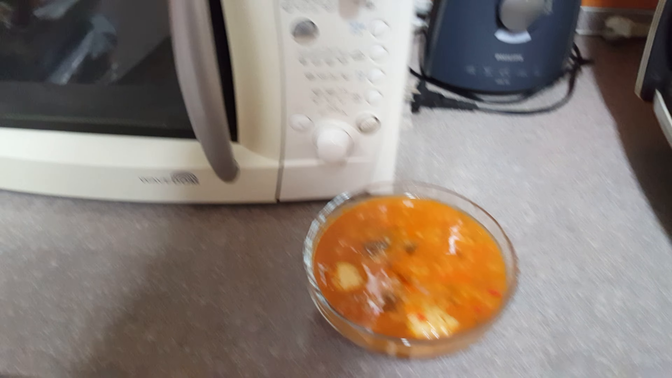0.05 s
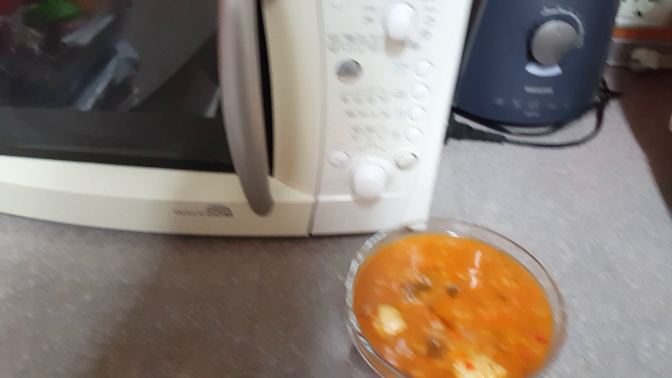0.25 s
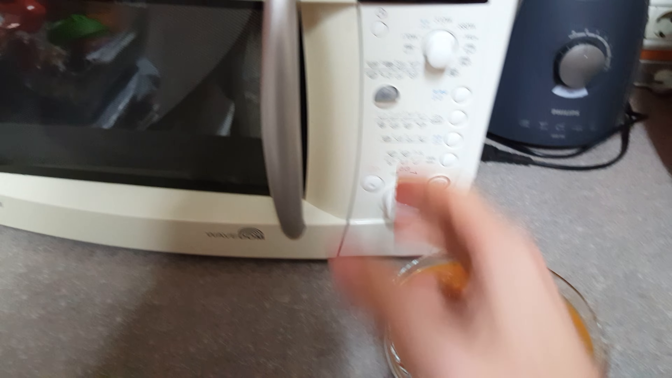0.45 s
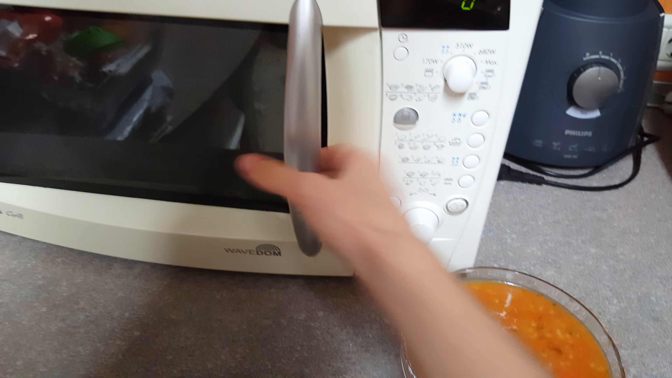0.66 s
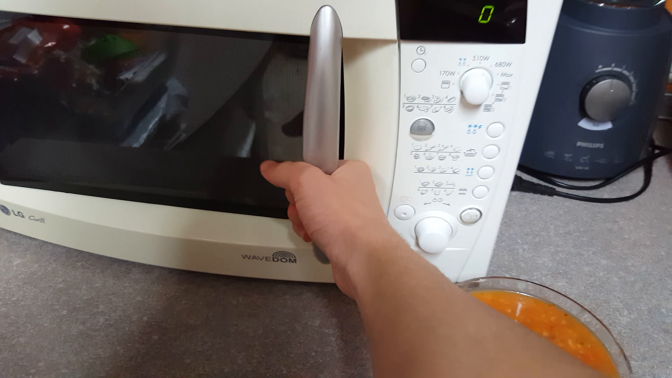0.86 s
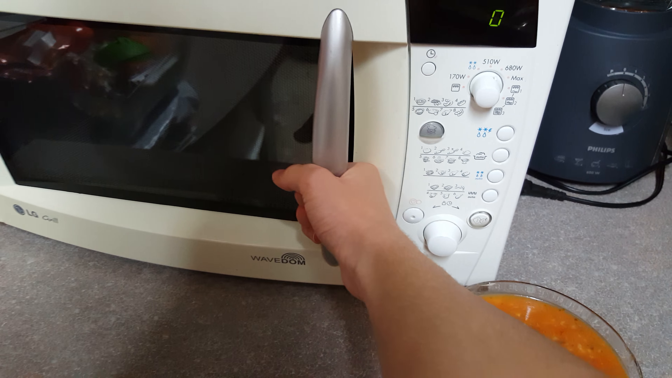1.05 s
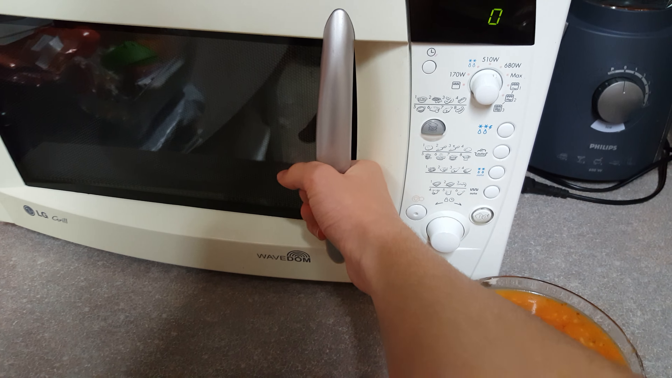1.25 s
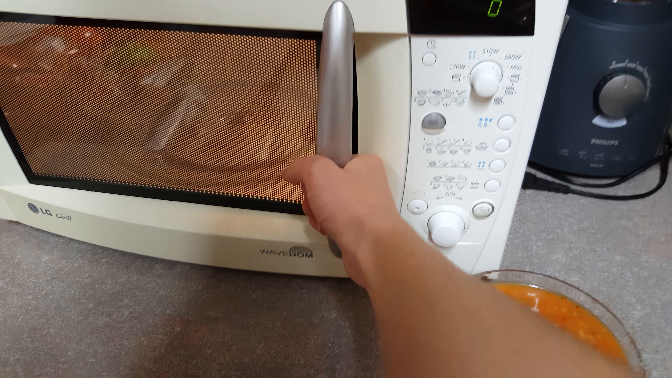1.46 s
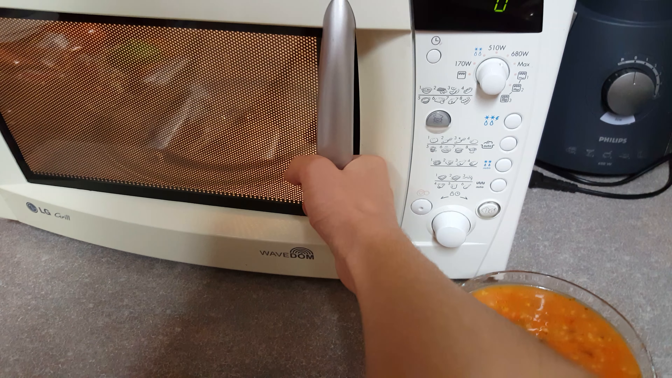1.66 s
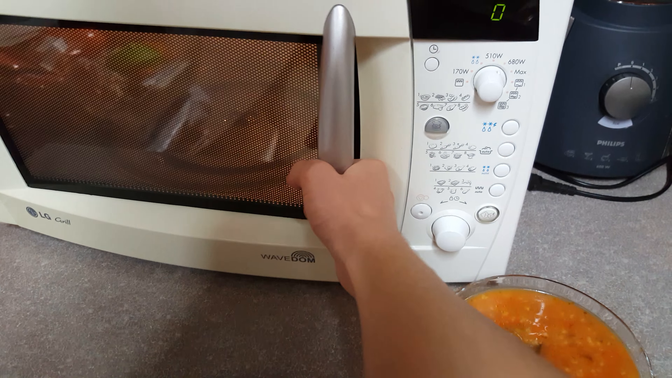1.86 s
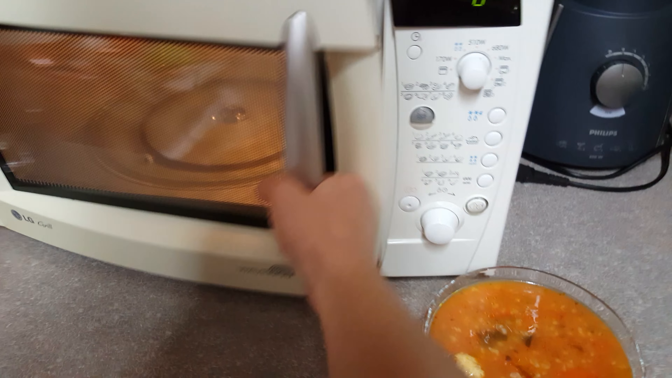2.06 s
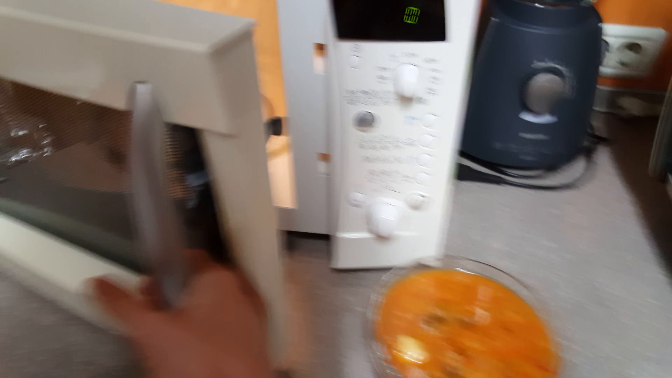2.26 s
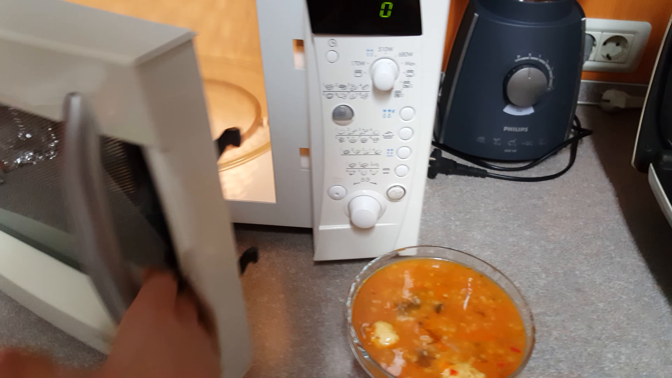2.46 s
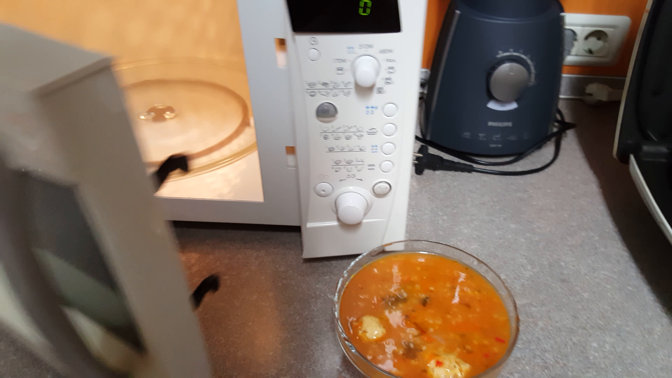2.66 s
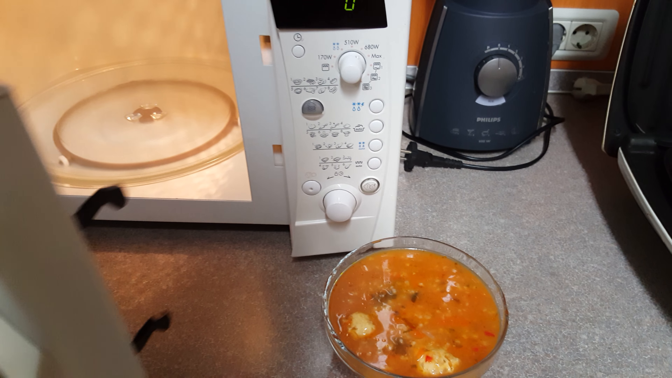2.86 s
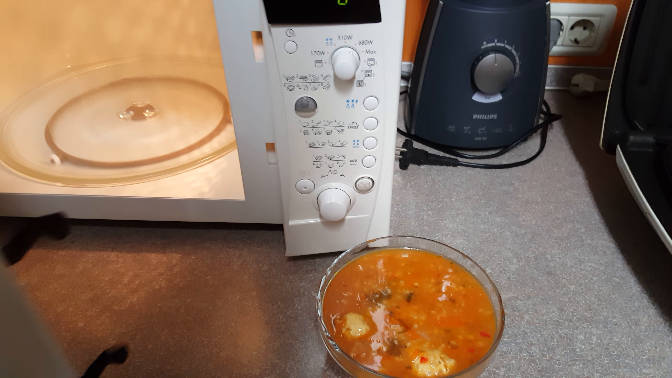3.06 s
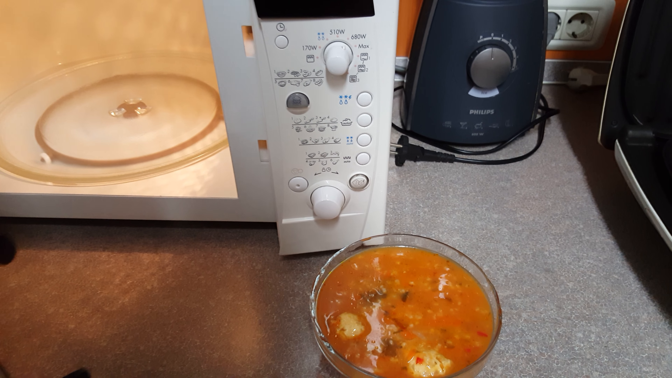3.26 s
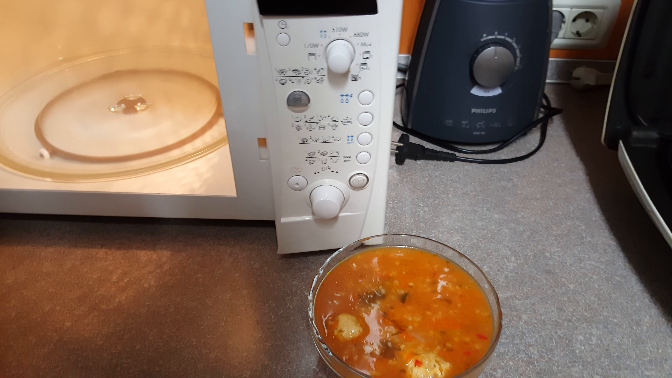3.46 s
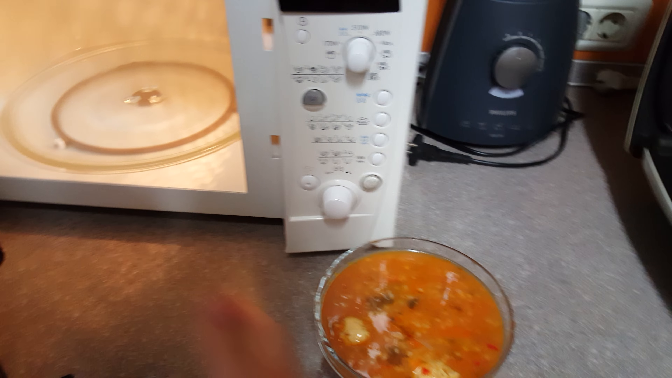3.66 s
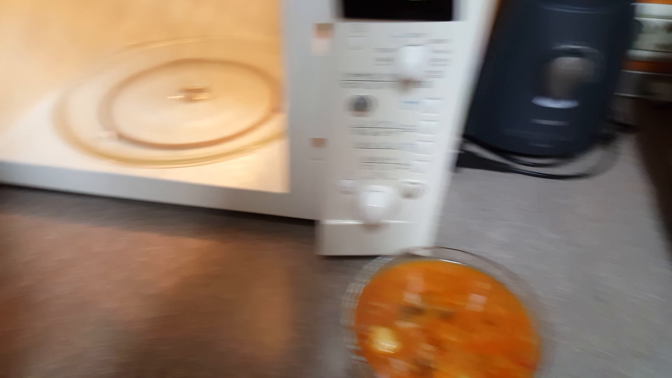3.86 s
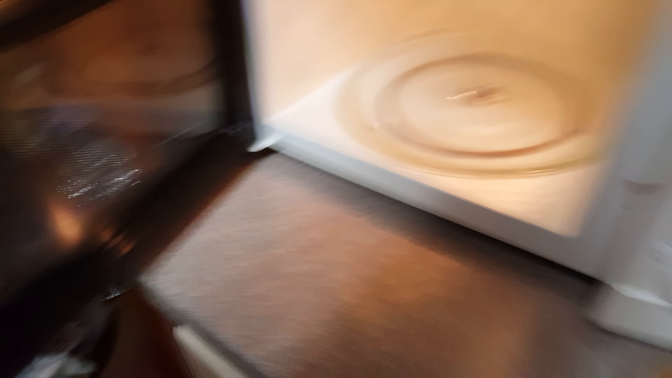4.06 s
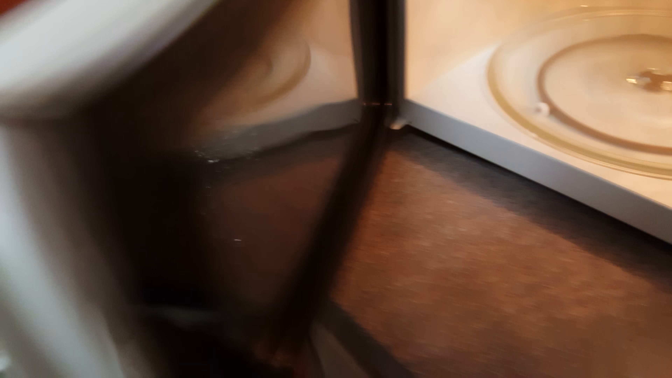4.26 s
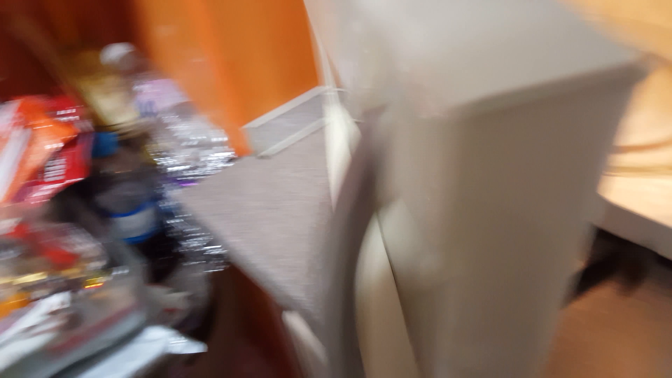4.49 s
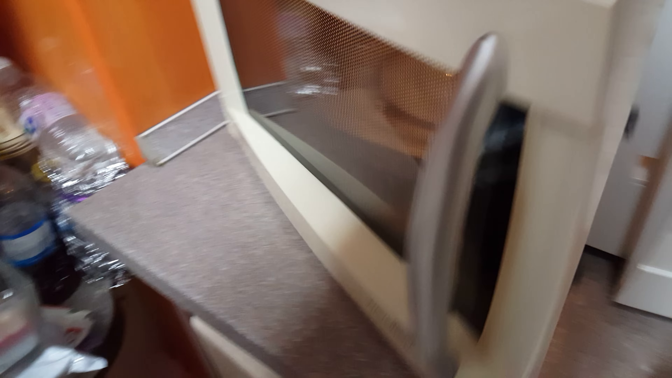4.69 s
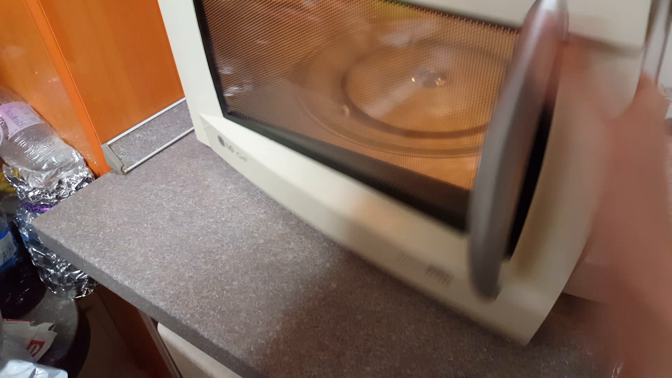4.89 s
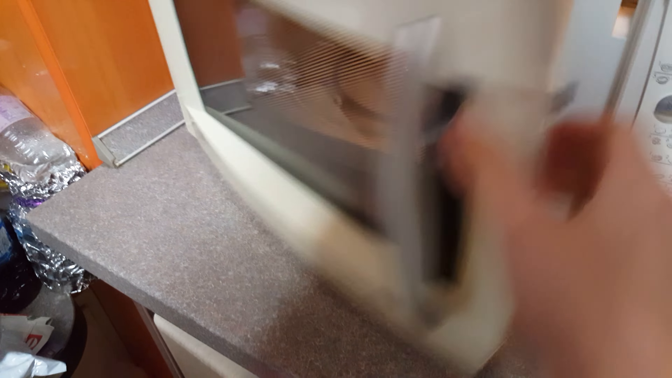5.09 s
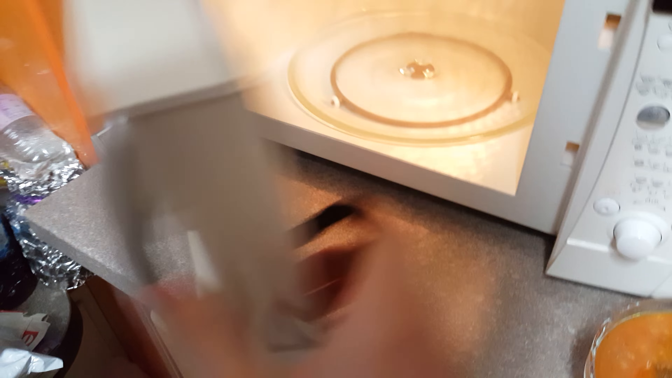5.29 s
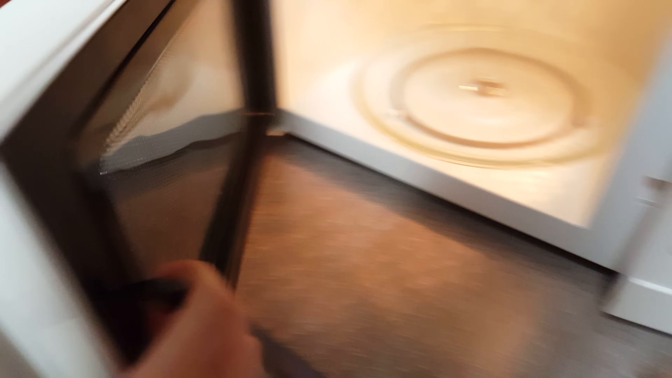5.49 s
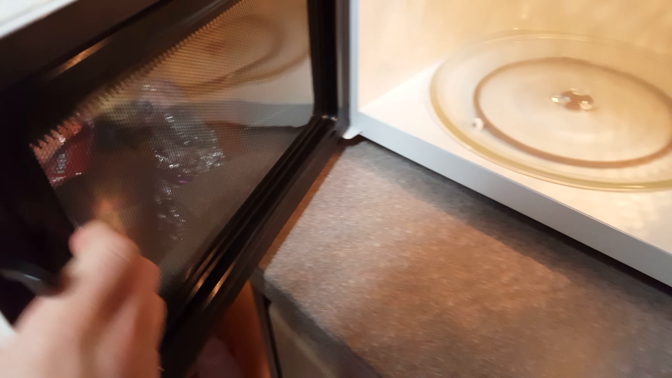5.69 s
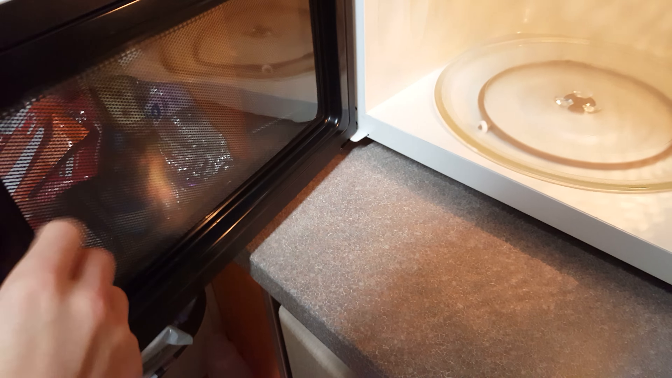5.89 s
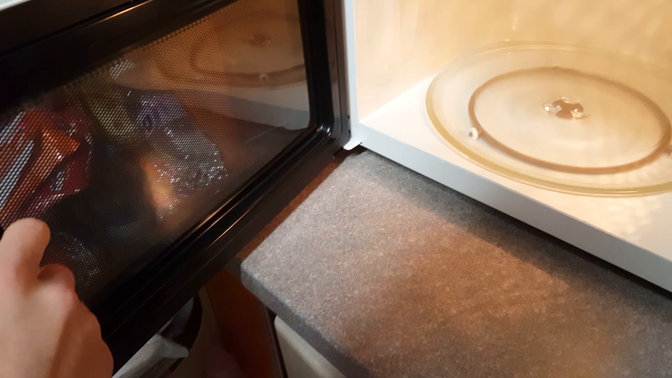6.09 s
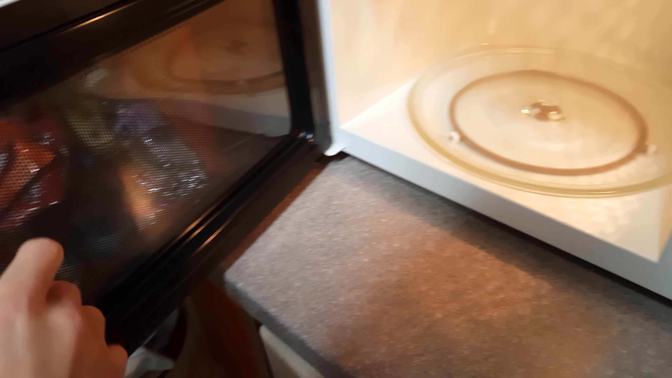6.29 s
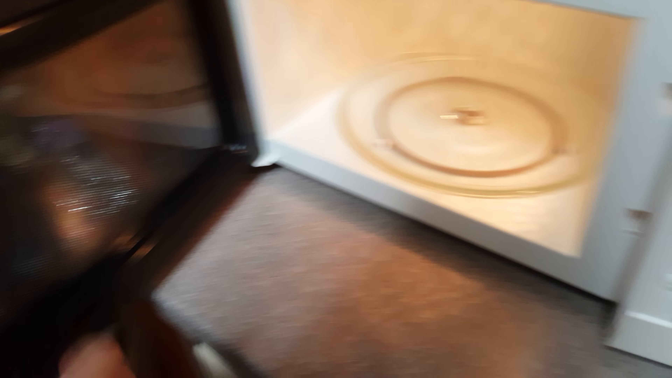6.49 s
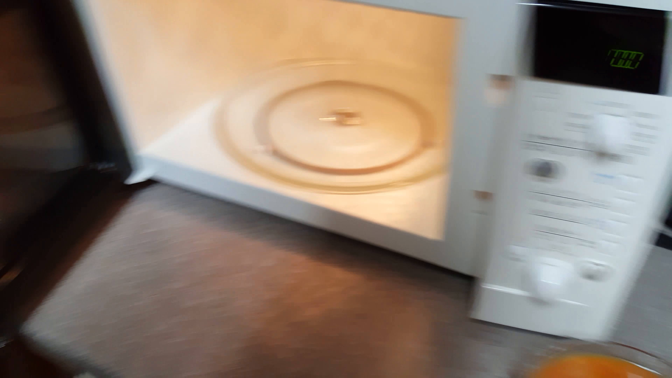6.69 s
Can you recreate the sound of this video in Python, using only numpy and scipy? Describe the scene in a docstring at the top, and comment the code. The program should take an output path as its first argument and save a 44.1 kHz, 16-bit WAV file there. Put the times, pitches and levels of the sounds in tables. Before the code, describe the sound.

Heard at arm's length in stereo: light knocks of fingers on a hollow plastic microwave door, then clicks and a rapid, heavy, boomy clatter as the latch releases. A dry rasp and short thin hinge squeak follow as it swings. About a second of quiet air passes before a hard double bang and rattle. The door swings back, is caught with a crisp clack, and is handled gently with faint scrapes and a last dull tap.

```python
"""In a small kitchen, at arm's length from a microwave oven, a two-port microphone hears its door opened by hand.
A hand grips the handle, latch hooks drag and snap free, the hinge squeaks; the door bumps, rattles against its stop,
swings back and is caught. Blows are noise bursts ringing panel modes; shoves are short low thumps that boom in the
steel cabinet. Slides are dense runs of tiny slips, the squeak is a few harmonics, and thin ticks are filtered noise.
Still air (shaped noise) and a faint mains hum (sines) lie underneath; decaying noise gives the room."""
import sys
import numpy as np
from scipy import signal
from scipy.fft import rfft, irfft, next_fast_len
from scipy.io import wavfile
from scipy.ndimage import uniform_filter1d

SR = 44100
rng = np.random.default_rng(int(sys.argv[2]) if len(sys.argv) > 2 else 0)


def to_wav(s):
    """Save 16-bit WAV."""
    ch = np.atleast_2d(s).T  # columns
    pcm = np.round(np.clip(ch, -1, 1) * 32767)  # PCM
    wavfile.write(sys.argv[1], SR, pcm.astype(np.int16))


N = 297234
TIME = np.arange(N) / SR  # seconds
AGE = TIME[:SR // 2]  # seconds since the start of one short sound

# Still air of the kitchen, relative spectrum: pitch_hz [Hz], level_db [dB per Hz]
AIR_COLOUR = [(15, -30), (25, -4), (53, -9.5), (70, -14), (102, -4.5), (229, -7), (285, -2.5), (503, -10.5),
              (560, -11), (1440, -21.5), (2690, -21.5), (3250, -29), (5430, -33), (16000, -38)]
AIR_DB = -55
# Electrical hum: pitch_hz [Hz], level_db [dB, rms]
HUM = [(48.4, -64.5), (96.9, -63), (285.3, -66.5)]

# Blows on the door, from the grip on the handle to the catch by hand: start_s [s], strength_db [dB],
# hardness [dB per octave of treble], spot_hz [Hz, note of the struck spot], rebounds [count, rounded]
BLOWS = [ (0.348, -48.5, -1, 1110, 0), (0.65, -35, 1, 810, 0.89), (0.713, -37, 2.5, 940, 0.0061),
         (0.732, -38, 3, 890, 0), (0.747, -24, 1.5, 869, 1), (0.897, -36, -21, 840, 0),
         (1.344, -37.5, -7.5, 560, 0), (1.378, -26, 1, 850, 0), (1.482, -25.5, 3.5, 960, 0),
         (1.505, -12, -7, 1008, 0), (1.514, -17.5, 2, 840, 0), (1.58, -33, 7.5, 940, 0),
         (1.689, -29.5, 6, 1060, 0), (1.742, -23.5, -6, 860, 0), (1.754, -33.5, 6.5, 1240, 0),
         (1.768, -12, -3, 878, 0), (1.835, -29.5, 7, 844, 0), (1.896, -21, -1.5, 856, 0),
         (1.907, -15.5, -0.5, 1000, 1), (1.942, -21, 4, 820, 0), (1.965, -12, 0.2, 800, 0),
         (1.977, -14, -0.5, 886, 0), (1.995, -18, 0.2, 882, 1), (2.064, -29, 4.5, 757, 0),
         (2.141, -36.5, 2, 1020, 0.097), (2.201, -27, 1.5, 2500, 0), (2.248, -18, -6.5, 933, 1),
         (2.304, -32.5, 4, 2200, 0.21), (2.589, -28, 4.5, 1150, 0), (3.782, -22, -3, 1130, 0),
         (3.79, -13.5, 1.4, 1850, 0), (3.796, -15, 0.5, 1945, 0), (3.878, -26.5, 1.5, 1740, 0.13),
         (3.93, -30.5, -0.5, 1484, 0), (4.042, -10.5, 1.5, 1130, 0), (4.05, -7, -0.5, 1170, 0),
         (4.065, -17, 0.5, 840, 0), (4.079, -11.5, 0.5, 864, 0), (4.092, -14.5, 0.5, 2155, 0),
         (4.11, -17, 1, 1035, 0), (4.484, -41, 0, 1240, 0.093), (4.782, -37, 1, 1966, 0.54),
         (4.931, -20.5, 1.35, 3290, 0), (4.951, -32, -0.5, 906, 0), (4.963, -34, 3, 760, 0),
         (4.981, -24.5, 2.5, 900, 0), (5.128, -47.5, 6.5, 770, 0), (5.501, -38, -3.5, 870, 0),
         (5.631, -39, -2.5, 1510, 0.14), (6.06, -26.5, -4, 1175, 0), (6.072, -34, -5, 610, 0)]
# Clicks of the light latch parts: start_s [s], strength_db [dB], spot_hz [Hz]
CLICKS = [(0.838, -26.5, 1308), (0.856, -44, 980), (1.381, -32.5, 1445), (1.397, -24.5, 940),
          (1.418, -26, 1100), (1.644, -24, 1080), (2.086, -28, 2890), (2.182, -28.5, 2530)]
# The clicks are all hard (dB per octave) and carry little weight (dB of knock)
CLICK_HARDNESS, CLICK_KNOCK_DB = 3.3, -12
# A softer contact pushes longer and so knocks more: dB of knock per unit of hardness
KNOCK_DB_PER_HARDNESS = -0.44
# A loose part rebounds later and weaker: delay of the first, exponent of later delays, drop of the first
REBOUND_S, REBOUND_WIDENING, REBOUND_DB = 0.0095, 1.3, -5
# Registers of a blow (clack, knock, snap, tick): low_hz [Hz], high_hz [Hz], trim_db [dB],
# rise_s [s, time constant], contact_t60_s [s, decay of the contact noise], room_db [dB sent to the room]
REGISTERS = [(640, 2200, -9.5, 0.0019, 0.071, -2.5), (212.3, 700, -6, 0.0014, 0.093, -7),
             (2500, 5300, -17, 0.00047, 0.12, -5), (5830, 15300, -24, 0.00015, 0.08, -5)]
# Door panel modes: pitch_hz [Hz], level_db [dB, relative], t60_s [s]
DOOR = [(177.3, 2, 0.22), (205.8, -5, 0.21), (274.8, -4.5, 0.26), (373.9, -6, 0.23), (408.5, -0.5, 0.12),
        (444, -4, 0.16), (542.3, -7, 0.13), (610, -22, 0.35), (714.3, -9.5, 0.13), (864, -6, 0.1),
        (970, -22, 0.27), (1147, -10, 0.16), (1160, -24, 0.11), (1387, -42, 0.091), (1488, -3.5, 0.027),
        (1920, -25, 0.15), (2260, -5.5, 0.062), (2386, -7.5, 0.058), (2621, -10, 0.11), (2738, -21.5, 0.24),
        (2820, -16, 0.048), (3292, -9, 0.15), (3400, -2.5, 0.02), (3790, -10, 0.072), (4680, -45, 0.1),
        (5370, -28, 0.14)]
# Contact noise, the plastic's countless short modes: pitch_hz [Hz], level_db [dB, relative]
PLASTIC = [(60, 6), (150, 15), (260, -1), (450, 3.5), (700, -1.5), (1050, 2), (1600, -3), (2500, -3.5),
           (3600, -7), (5200, -12.5), (8000, -11.5), (11000, -15.5), (16000, -20)]
# The low note of a struck spot rises with the strength of the blow, from its pitch at a middling one
SPOT_HZ, SPOT_HZ_PER_DB, MIDDLING_DB, SPOT_SPREAD_HZ = 421.8, 3.0, -24.5, 25
# Hardness tilts the registers about this pitch; the register wholly below it takes the weight of knock
PIVOT_HZ = 1150

# Shoves that reach the cabinet: start_s [s], peak_db [dB], pitch_hz [Hz, flexing door]
SHOVES = [(0.664, -36, 112), (0.766, -19.5, 110), (0.896, -23, 112.7), (0.925, -23, 108),
          (0.986, -35.5, 103), (1.383, -20, 114.3), (1.508, -7.5, 125.2), (1.573, -18, 122),
          (1.612, -16.5, 131.7), (1.68, -23, 105), (1.768, -7, 114), (1.815, -17, 118), (1.898, -14.5, 128),
          (1.937, -16, 114), (1.987, -22, 87), (2.246, -21.5, 115), (3.797, -14, 115), (4.043, -20, 146),
          (4.953, -24.5, 106), (5.169, -29.5, 117), (6.065, -35, 103.6)]
# Cabinet modes: pitch_hz [Hz], level_db [dB, relative], t60_s [s]
CABINET = [(118, 11, 0.57), (99.4, 5, 0.45), (137.2, -3, 0.6)]
# Cabinet drone as the door swings back on its hinge: start_s [s], length_s [s], level_db [dB]
DRONE = [(4.64, 0.18, -34.5)]

# Strokes of sliding hooks and fingers: start_s [s], length_s [s], level_db [dB]
SLIDE = [(0.71, 0.17, -43), (1.37, 0.14, -38.5), (1.48, 0.54, -33), (1.92, 0.039, -31.5), (2.14, 0.16, -41),
         (2.36, 0.36, -58), (3.85, 0.062, -36), (4.0, 0.37, -53), (4.465, 0.055, -46), (4.87, 0.46, -48),
         (5.43, 0.19, -49), (5.78, 0.17, -53), (6.0, 0.61, -60)]
# Spectrum of those strokes: pitch_hz [Hz], level_db [dB, relative]
SLIDE_COLOUR = [(50, -18), (120, -27), (170, 11), (300, 3.5), (430, 12.5), (700, -4.5), (1200, -4),
                (1700, -8.5), (2600, -11), (4000, -21.5), (6300, -17.5), (8500, -19), (16000, -35)]
# Dry rasps as the hooks leave their slots and the hinge starts to turn: start_s [s], length_s [s], level_db [dB]
RASP = [(2.135, 0.084, -37.5), (2.3, 0.059, -41.5)]
# Spectrum of the rasps: pitch_hz [Hz], level_db [dB, relative]
RASP_COLOUR = [(200, -57), (1000, -2), (1500, -11.5), (2000, -3.5), (2450, -7), (3100, -11), (3700, -10.5),
               (4500, -20), (7000, -25), (16000, -31)]
# Duller scrapes of the hand on the door's edge: start_s [s], length_s [s], level_db [dB]
SCRAPE = [(3.925, 0.026, -35), (4.48, 0.04, -50.5), (5.32, 0.024, -63.5), (5.52, 0.07, -48)]
# Spectrum of the scrapes: pitch_hz [Hz], level_db [dB, relative]
SCRAPE_COLOUR = [(150, -25), (550, -1), (900, -3.5), (1550, -3), (2300, -17), (5000, -27), (16000, -45)]

# Runs of faint thin ticks: start_s [s], ticks [count], level_db [dB, relative]
TICKS = [(0.959, 2, -56), (2.471, 2, -40), (2.685, 2, -42), (3.916, 1, -37), (4.138, 2, -34.5),
         (4.277, 4, -43), (5.051, 7, -45), (5.705, 2, -44), (5.988, 1, -47.5), (6.13, 2, -43.5)]
TICK_PERIOD_S = 0.0716
# Hinge squeak: time_s [s], pitch_hz [Hz], fundamental_db [dB, relative], octave_db [dB, relative]
SQUEAK = [(2.36, 1086, -60, -52), (2.406, 1071, -39.5, -41), (2.422, 1174, -45, -51),
          (2.478, 1190, -39, -49), (2.514, 1184, -39.5, -44.5), (2.574, 1204, -42.5, -61),
          (2.59, 1150, -46, -57)]

# Reverberation of the room: pitch_hz [Hz], t60_s [s]
ROOM = [(150, 0.99), (300, 0.6), (600, 0.32), (1200, 0.38), (2400, 0.33), (4800, 0.43), (9600, 0.33),
        (15000, 0.44)]
# Balance of the two microphone ports: pitch_hz [Hz], left_minus_right_db [dB]
BALANCE_DB = [(200, 0.6), (700, -.5), (1300, -.4), (2400, 2.9), (4400, 4.1), (5700, 3), (7500, -4),
              (15000, -4.5)]
# Likeness of what the two ports hear: pitch_hz [Hz], likeness [0-1]
LIKENESS = [(100, 0.78), (270, 0.96), (500, 0.76), (1000, 0.11), (2000, 0.0075), (8000, 0.0093)]
# Resonances of the microphone's ducts: pitch_hz [Hz], level_db [dB]
DUCTS = [(1500, -0.5), (2100, -1.5), (2700, 0.5), (3200, -1), (5500, 3), (6100, -3.5), (9400, 0.5),
         (10400, -9), (12500, -2.5), (16000, -1)]
LOW_CUT_HZ, TOP_HZ = 26, 16150


def amp(db):
    """Decibels to gain."""
    return 10 ** (np.asarray(db) / 20)


def curve(rows):
    """Each column of a time table, joined by straight lines."""
    s, *columns = np.transpose(rows)
    return [np.interp(TIME, s, c) for c in columns]


def over_hz(points, size):
    """A (Hz, value) table read at the bins of a spectrum, along a logarithmic pitch scale."""
    hz, value = np.transpose(points)
    bins_hz = np.arange(size // 2 + 1) * SR / size
    return np.interp(np.log(bins_hz + 1), np.log(hz), value)


def unit(x):
    """Scale to rms 1."""
    return x / np.sqrt(np.mean(x ** 2))


def colour(x, points):
    """Give a steady sound a spectrum."""
    size = x.shape[-1]
    return irfft(rfft(x) * amp(over_hz(points, size)), size)


def band(x, lo_hz, hi_hz):
    """Causal band-pass."""
    edges_hz = [lo_hz, min(hi_hz, SR / 2 - 1)]
    return signal.sosfilt(signal.butter(3, edges_hz, "band", fs=SR, output="sos"), x)


def ports(pair):
    """Two unrelated signals become a stereo pair, most alike in the bass."""
    size = pair.shape[-1]
    alike = np.clip(over_hz(LIKENESS, size), 0, 1)
    mid, side = rfft(pair) * np.sqrt([(1 + alike) / 2, (1 - alike) / 2])
    return irfft(np.array([mid + side, mid - side]), size)


def noise(size):
    """White stereo noise as the two ports hear it."""
    return ports(rng.standard_normal((2, size)))


def fade(t60):
    """Exponential decay, down 60 dB after t60 seconds."""
    return np.exp(-np.log(1000) * AGE / t60)


def add(track, s, sound):
    """Mix a sound into a track at time s."""
    start = int(s * SR)
    track[..., start:start + sound.shape[-1]] += sound[..., :N - start]


def swells(rows, attack_s, release_s):
    """Each stroke builds up, holds for its length and dies away."""
    out = 0
    for s, length, db in rows:
        age = np.maximum(TIME - s, 0)
        rise = (1 - np.exp(-age / attack_s)) ** 2
        release = np.exp(-np.maximum(age - length, 0) / release_s)
        out = out + amp(db) * rise * release
    return out


def kitchen():
    """Still air as shaped noise, and a low electrical hum of steady sines."""
    air = unit(colour(noise(next_fast_len(N, True)), AIR_COLOUR))[:, :N]
    hum = 0
    for hz, db in HUM:
        hum = hum + amp(db) * np.sqrt(2) * np.sin(2 * np.pi * (hz * TIME + rng.random()))
    return air * amp(AIR_DB) + hum


def contacts():
    """The latch clicks and every blow with its rebounds: (s, dB, hardness, knock dB, spot Hz)."""
    hits = [(s, db, CLICK_HARDNESS, CLICK_KNOCK_DB, hz) for s, db, hz in CLICKS]
    for s, db, hardness, hz, rebounds in BLOWS:
        knock_db = KNOCK_DB_PER_HARDNESS * hardness
        for k in range(round(rebounds) + 1):
            hit_s = s + REBOUND_S * k ** REBOUND_WIDENING
            hits.append((hit_s, db + REBOUND_DB * np.sqrt(k), hardness, knock_db, hz))
    return hits


def door_blows(ring_db=-10.5, scatter_db=3.0, low_spot_db=-2, low_spot_t60=0.062,
               high_spot_db=-4, high_spot_t60=0.048, onset_s=0.016):
    """Each contact is a noise burst, the panel modes and two short notes of the struck spot; harder is brighter."""
    direct, sent = np.zeros((2, 2, N))
    hz, db, t60 = np.transpose(DOOR)
    modes = amp(db)[:, None] * np.exp(2j * np.pi * hz[:, None] * AGE) * fade(t60[:, None])
    for s, strength_db, hardness, knock_db, high_hz in contacts():
        size, lag = rng.standard_normal((2, len(DOOR)))
        low_hz = SPOT_HZ + SPOT_HZ_PER_DB * (strength_db - MIDDLING_DB)
        low_hz = low_hz + SPOT_SPREAD_HZ * rng.standard_normal()
        # short waves reach the two ports out of step
        turn = np.exp(1j * np.outer([1, -1], lag * np.minimum(hz / 900, 1.5) ** 2))
        ring = ((turn * amp(scatter_db * size)) @ modes).imag * amp(ring_db)
        low_note = np.sin(2 * np.pi * low_hz * AGE) * fade(low_spot_t60)
        high_note = np.sin(2 * np.pi * (high_hz * AGE + rng.random((2, 1)) / 2)) * fade(high_spot_t60)
        ring = ring + amp(low_spot_db) * low_note + amp(high_spot_db) * high_note
        grit = unit(colour(noise(len(AGE)), PLASTIC))
        for lo_hz, hi_hz, trim_db, rise_s, contact_t60, room_db in REGISTERS:
            octaves = np.log2(np.sqrt(lo_hz * hi_hz) / PIVOT_HZ)
            tilt_db = knock_db if hi_hz < PIVOT_HZ else hardness * octaves
            rise = 1 - np.exp(-AGE / rise_s)
            part = band((ring + grit * fade(contact_t60)) * rise, lo_hz, hi_hz)
            # level set by the first moments of the blow
            part = part * amp(strength_db + tilt_db + trim_db) / np.std(part[:, :int(onset_s * SR)])
            add(direct, s, part)
            add(sent, s, part * amp(room_db))
    return direct, sent


def cabinet(shove_s=0.019, rise_s=0.008, ring_db=-6, overtone_hz=284, overtone_db=-17):
    """A shove flexes the door for a few cycles and leaves the steel box booming; it drones as the door swings back."""
    boom = sum(amp(db) * np.sin(2 * np.pi * hz * AGE) * fade(t60) for hz, db, t60 in CABINET)
    boom = boom * (1 - np.exp(-(AGE / rise_s) ** 2))
    boom = boom / np.abs(boom).max()
    # the hand takes up the flexing almost at once
    push = (AGE / shove_s) ** 2 * np.exp(2 * (1 - AGE / shove_s))
    out = np.zeros(N)
    for s, db, hz in SHOVES:
        thump = push * np.sin(2 * np.pi * hz * AGE) + amp(ring_db) * boom
        add(out, s, thump / np.abs(thump).max() * amp(db))
    drone = np.sin(2 * np.pi * CABINET[0][0] * TIME)
    drone = drone + amp(overtone_db) * np.sin(2 * np.pi * overtone_hz * TIME)
    return out + unit(drone) * swells(DRONE, attack_s=0.078, release_s=0.041)


def sliding(pressure, spectrum, slips_per_s, spread_db):
    """Plastic slides in a dense run of tiny uneven slips."""
    size = next_fast_len(N, True)
    happens = rng.random(size) < slips_per_s / SR
    slips = happens * amp(spread_db * np.minimum(rng.exponential(size=size), 4))
    rub = unit(colour(ports(slips * rng.standard_normal((2, size))), spectrum))
    return rub[:, :N] * pressure


def ticks(gain_db=-9, t60=0.12, lo_hz=4300):
    """Thin, bright bursts of decaying noise, singly or in short even runs."""
    out = np.zeros((2, N))
    for s, count, db in TICKS:
        for k in range(round(count)):
            tick = unit(band(colour(noise(len(AGE)), PLASTIC), lo_hz, TOP_HZ))
            add(out, s + k * TICK_PERIOD_S, tick * fade(t60) * amp(db + gain_db))
    return out


def hinge(rough=0.0667, settle_s=0.053, waver=0.0019, stutter_db=5, third_db=-15, fourth_db=-21, gain_db=-0.5):
    """The hinge catches unevenly, jittering pitch and level, then settles into a clean, mostly rising squeak."""
    hz, first_db, octave_db = curve(SQUEAK)
    start, end = SQUEAK[0][0], SQUEAK[-1][0]
    jitter, grip = unit(uniform_filter1d(rng.standard_normal((2, N)), size=110))
    catching = np.exp(-np.maximum(TIME - start, 0) / settle_s)
    phase = 2 * np.pi * np.cumsum(hz * (1 + (waver + rough * catching) * jitter)) / SR
    upper = np.sin(2 * phase) + amp(third_db) * np.sin(3 * phase) + amp(fourth_db) * np.sin(4 * phase)
    gate = uniform_filter1d(1. * ((TIME > start) & (TIME < end)), size=500)
    strength = gate * amp(gain_db + stutter_db * catching * (grip - 0.5))
    return np.sqrt(2) * strength * (amp(first_db) * np.sin(phase) + amp(octave_db) * upper)


def room(x):
    """Diffuse noise tail, each band decaying at its own rate; the deepest lasts longest."""
    size = len(AGE)
    hiss, tail = rfft(noise(size)), 0
    for k, (_, t60) in enumerate(ROOM):
        share = over_hz([(hz, j == k) for j, (hz, _) in enumerate(ROOM)], size)
        # the divisor evens out the energy of long and short decays
        tail = tail + irfft(hiss * share, size) * fade(t60) / np.sqrt(t60 * SR / np.log(1e6))
    build_up = 1 - np.exp(-AGE / 0.0015)
    return signal.fftconvolve(x, tail * build_up, axes=-1)[:, :N]


def scene(squeak_room_db=-12, small_room_db=-5, boom_room_db=-20):
    """All sources and their reverberation."""
    air_and_hum = kitchen()
    blows, sent = door_blows()
    boom = cabinet()
    slide_pressure = swells(SLIDE, attack_s=0.013, release_s=0.054)
    rasp_pressure = swells(RASP, attack_s=0.0075, release_s=0.033)
    scrape_pressure = swells(SCRAPE, attack_s=0.0044, release_s=0.012)
    slide = sliding(slide_pressure, SLIDE_COLOUR, slips_per_s=800, spread_db=-0.2)
    rasp = sliding(rasp_pressure, RASP_COLOUR, slips_per_s=3100, spread_db=0.5)
    scrape = sliding(scrape_pressure, SCRAPE_COLOUR, slips_per_s=1500, spread_db=0.5)
    small = slide + rasp + scrape + ticks()
    squeak = hinge()
    sent = sent + small * amp(small_room_db) + squeak * amp(squeak_room_db) + boom * amp(boom_room_db)
    return blows + boom + small + squeak + room(sent) + air_and_hum


def record(dry):
    """The ducts ripple the treble, each port in its own way; the deepest bass and the top are cut."""
    size = next_fast_len(N + 2048, True)
    balance_db = np.outer([.5, -.5], over_hz(BALANCE_DB, size))
    response = amp(over_hz(DUCTS, size) + balance_db)
    heard = irfft(rfft(dry, size) * response, size)[:, :N]
    heard = signal.sosfilt(signal.butter(2, LOW_CUT_HZ, "high", fs=SR, output="sos"), heard)
    clipped = np.clip(heard, -1, 1)
    return signal.sosfilt(signal.ellip(10, .2, 80, TOP_HZ, fs=SR, output="sos"), clipped)


dry = scene()
out = record(dry)
to_wav(out)
```